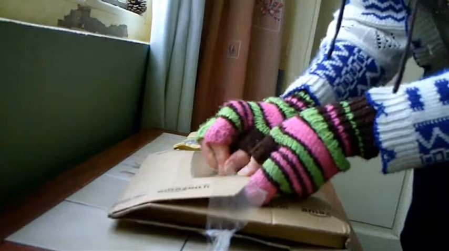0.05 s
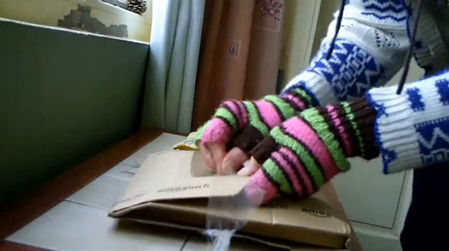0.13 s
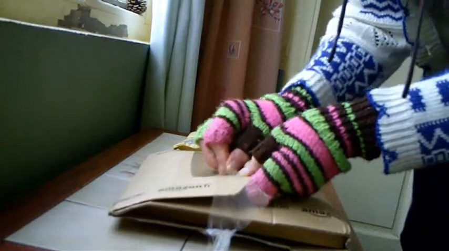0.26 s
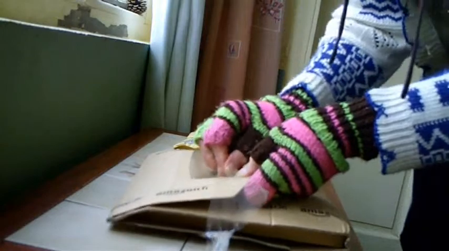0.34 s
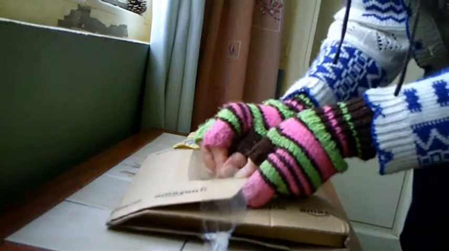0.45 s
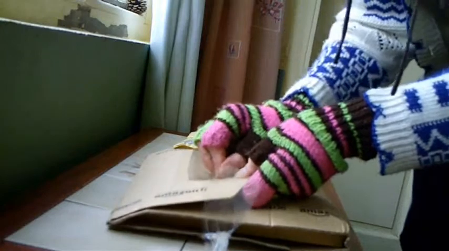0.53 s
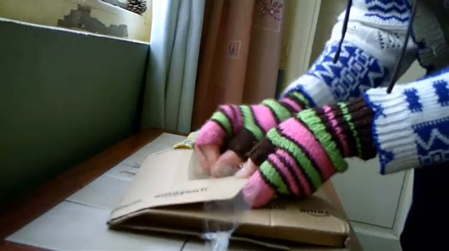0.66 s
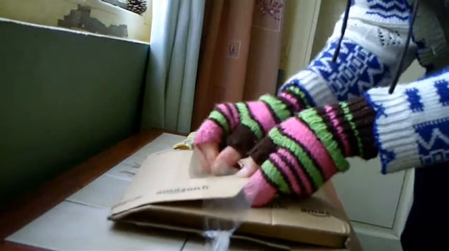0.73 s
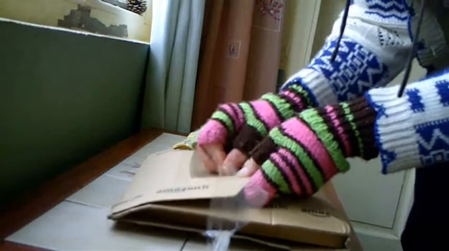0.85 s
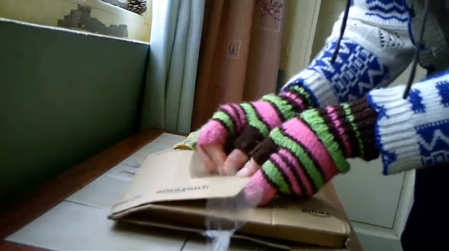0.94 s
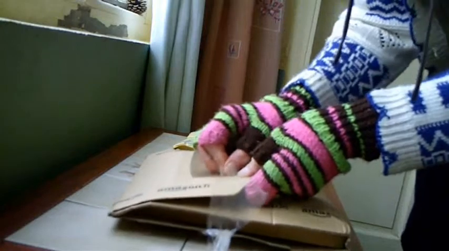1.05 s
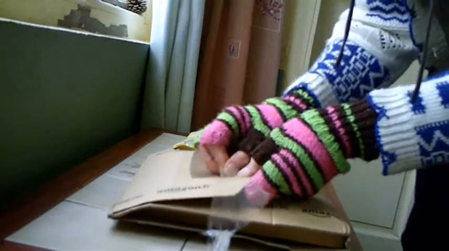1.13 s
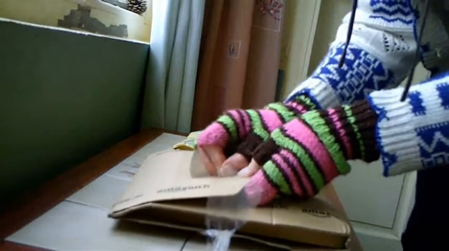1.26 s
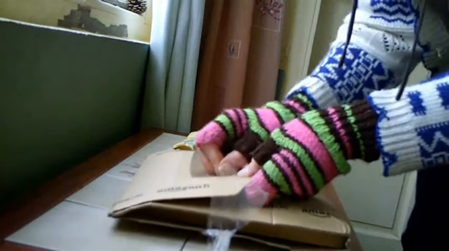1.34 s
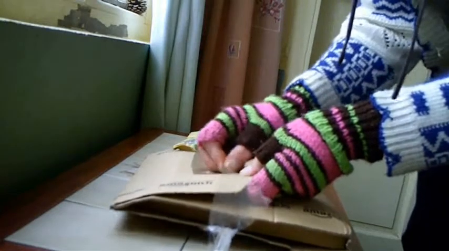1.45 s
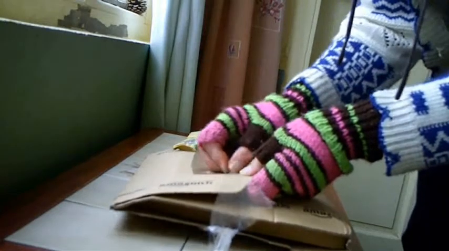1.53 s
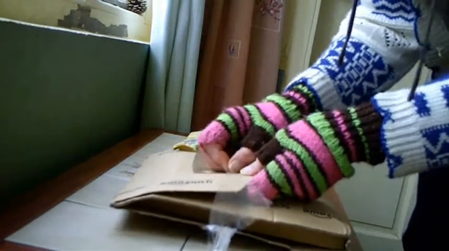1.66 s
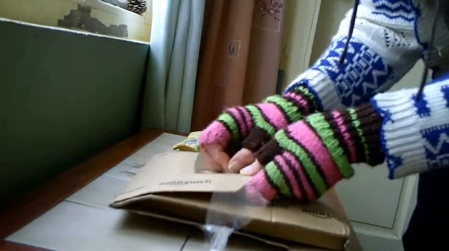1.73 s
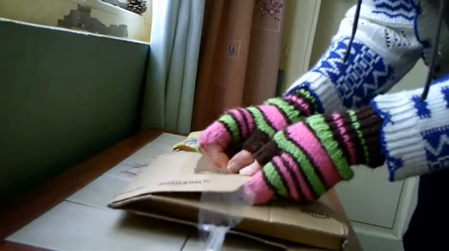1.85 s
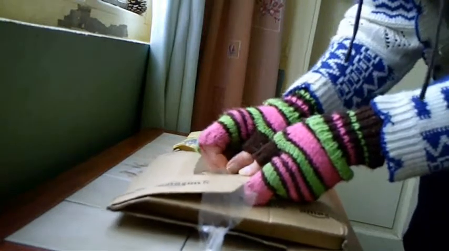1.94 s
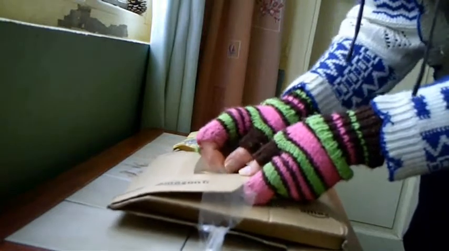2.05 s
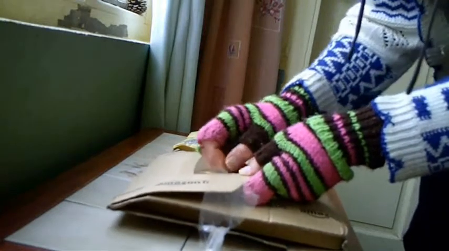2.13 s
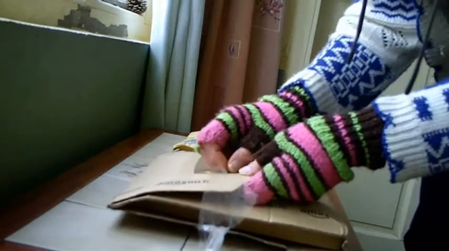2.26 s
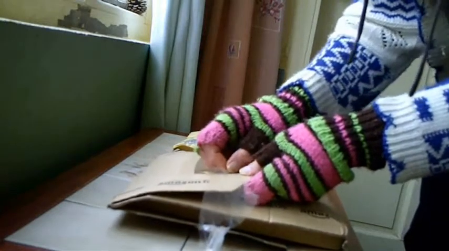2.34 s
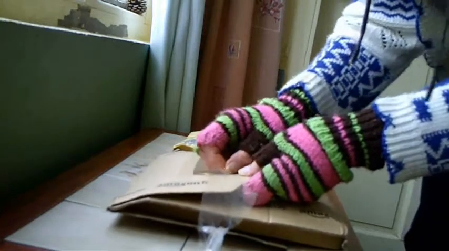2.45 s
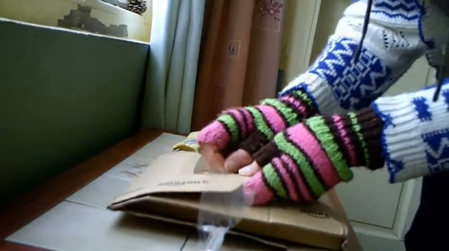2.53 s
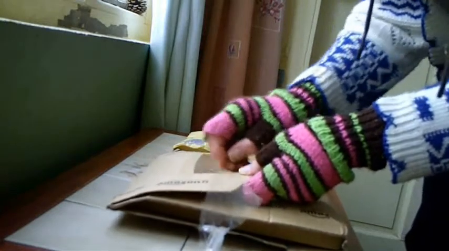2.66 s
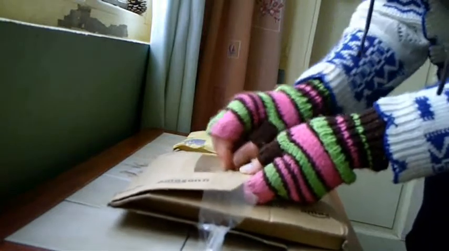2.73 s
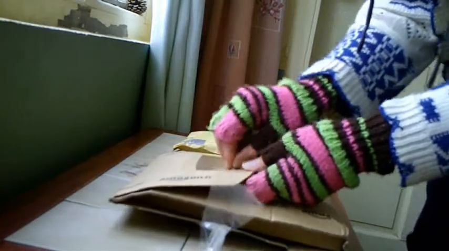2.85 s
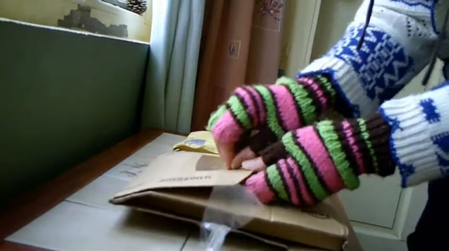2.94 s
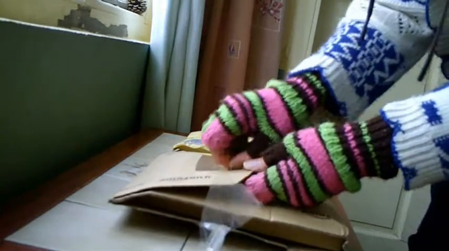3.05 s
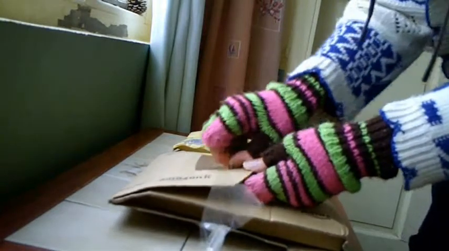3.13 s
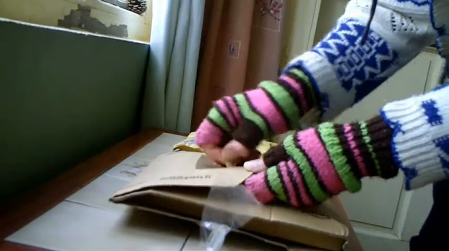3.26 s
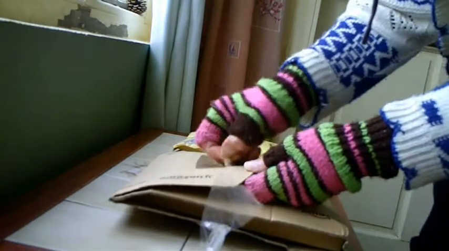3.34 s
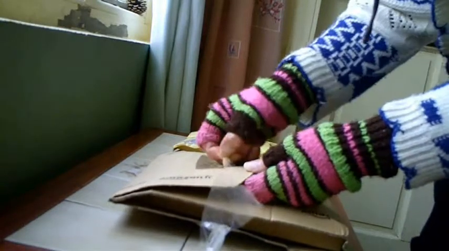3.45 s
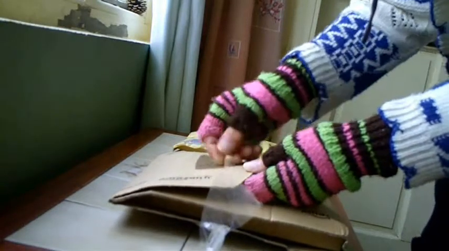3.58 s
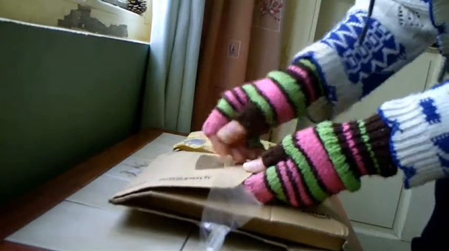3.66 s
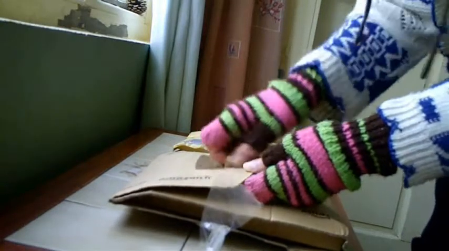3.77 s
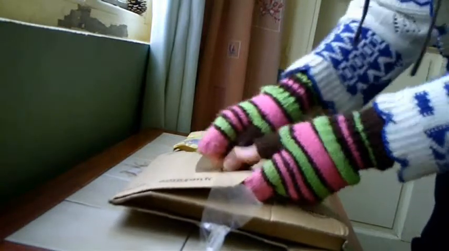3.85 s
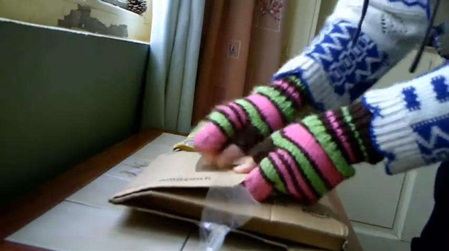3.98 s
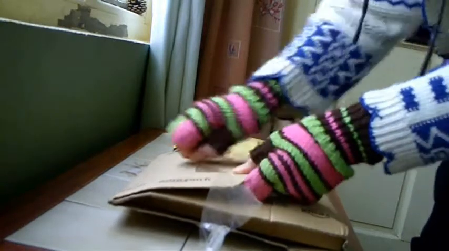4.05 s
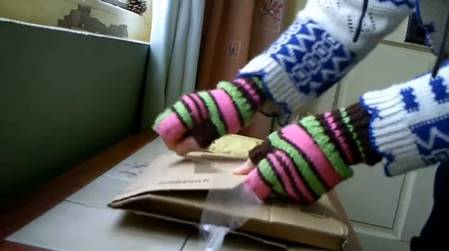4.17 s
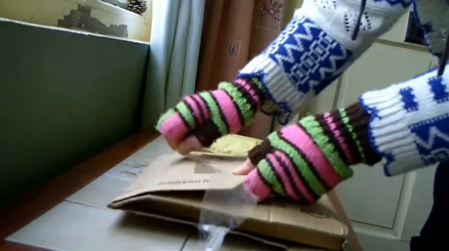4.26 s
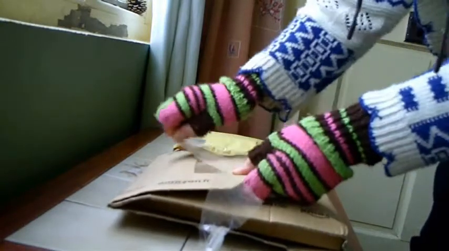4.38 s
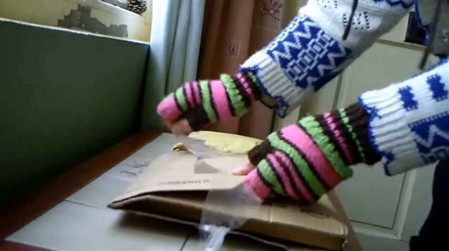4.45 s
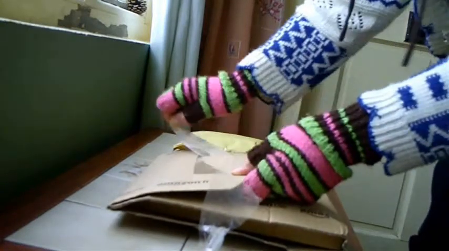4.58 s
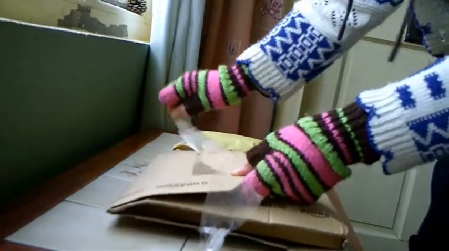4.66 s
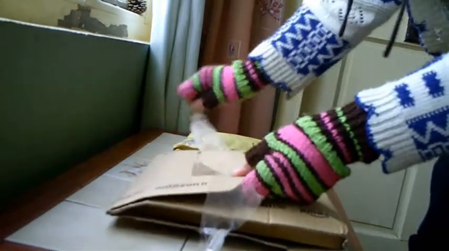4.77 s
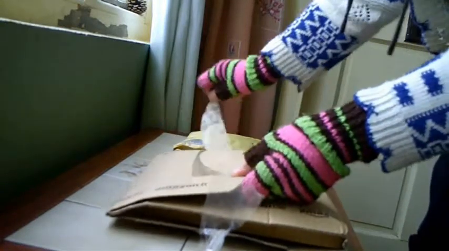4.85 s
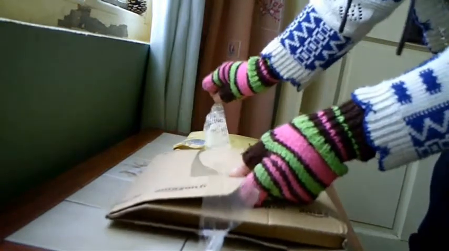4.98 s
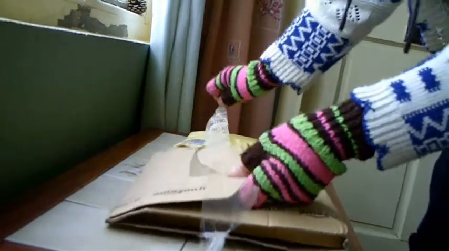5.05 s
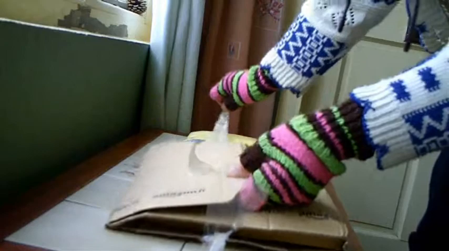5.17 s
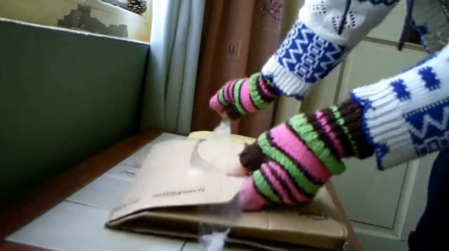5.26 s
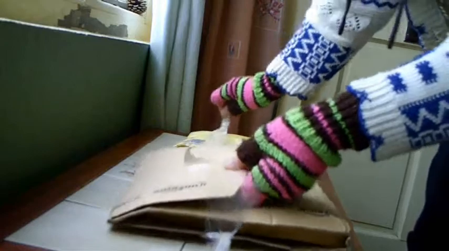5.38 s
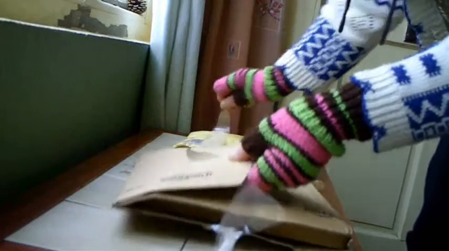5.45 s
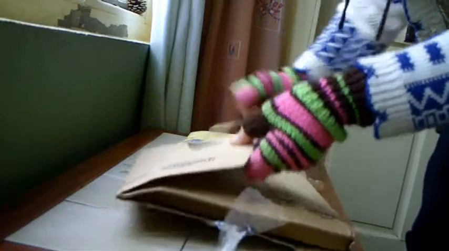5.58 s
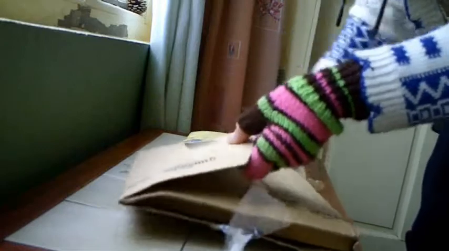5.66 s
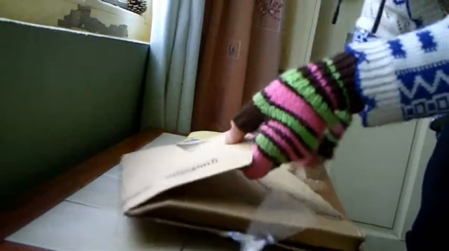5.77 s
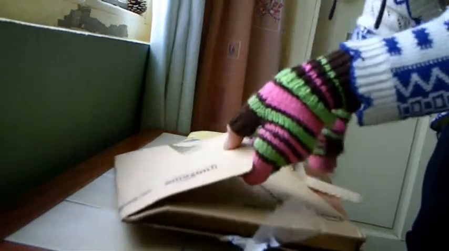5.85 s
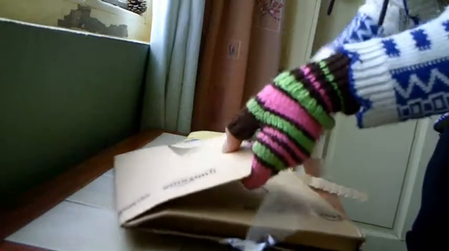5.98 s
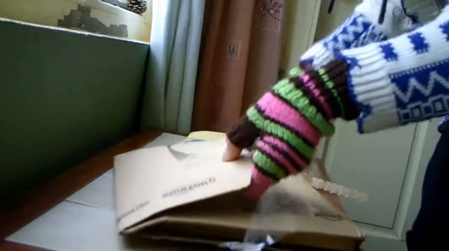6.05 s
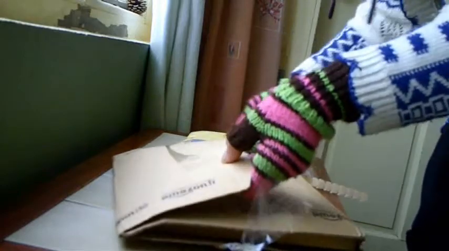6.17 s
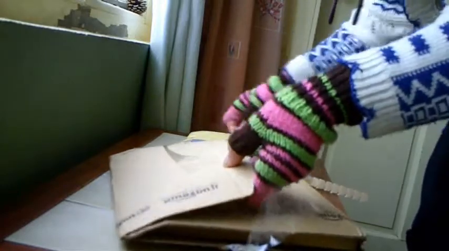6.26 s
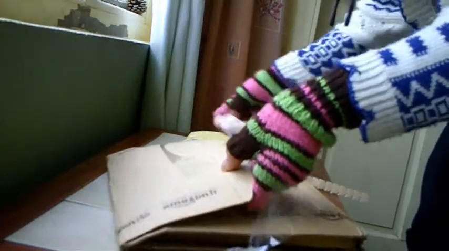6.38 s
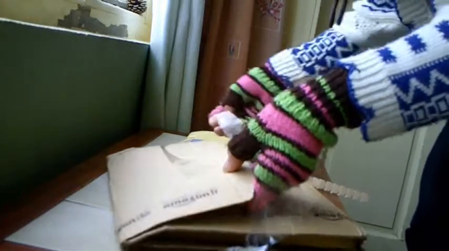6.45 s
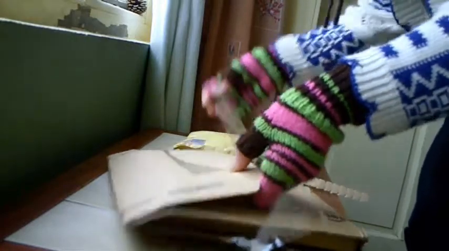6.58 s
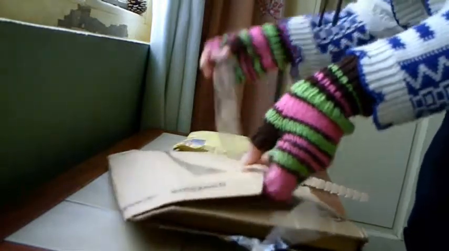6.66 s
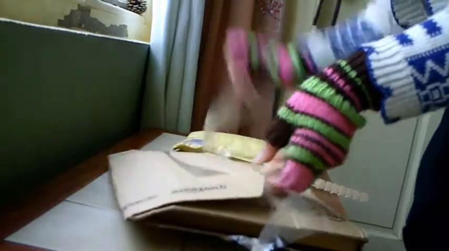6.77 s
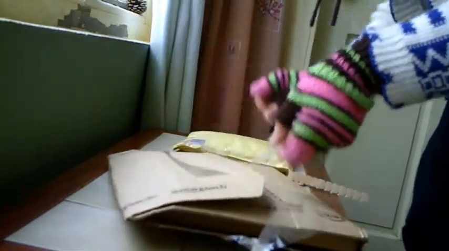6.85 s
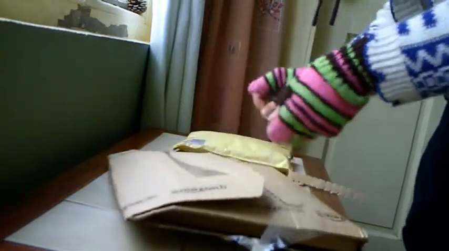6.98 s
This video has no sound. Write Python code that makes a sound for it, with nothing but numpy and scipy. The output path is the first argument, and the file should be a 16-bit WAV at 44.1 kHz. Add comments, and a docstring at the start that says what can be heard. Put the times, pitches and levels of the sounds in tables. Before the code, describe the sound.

Packing tape is picked loose and ripped off a cardboard box, breaking free with a crack, followed by rubbing and crinkling.

```python
"""Packing tape is picked loose and ripped off a flat cardboard box on a table in a small room.
The glue lets go in countless tiny snaps that fizz, drum on the box and ring in the taut strip,
until the tape breaks free with a crack and the lid thumps back. Fingers rub and flick the card
and the loose tape crinkles and squeaks, over a low rumble and the faint hum of a distant motor."""
import sys
import numpy as np
from scipy import signal
from scipy.fft import rfft, irfft, next_fast_len
from scipy.io import wavfile
from scipy.ndimage import uniform_filter1d

SR = 44100
rng = np.random.default_rng(int(sys.argv[2]) if len(sys.argv) > 2 else 0)


def unload_wav(signal):
    """Save mono or channel-first audio to the path in sys.argv[1] as 16-bit WAV at rate SR, clipped to [-1, 1]."""
    wavfile.write(
        sys.argv[1],
        SR,
        np.round(np.clip(np.atleast_2d(signal).T, -1, 1) * 32767).astype(np.int16),
    )


N = 309141
TIME = np.arange(N) / SR
BREAK_S = 5.209   # the tape comes free


def from_db(db):
    """Decibels to gain."""
    return 10 ** (np.asarray(db) / 20)


def unit_rms(x):
    """Scale to an rms of 1."""
    return x / np.sqrt(np.mean(x ** 2) + 1e-20)


def add(out, start, piece):
    """Mix a short sound in at a start time in seconds."""
    at = int(start * SR)
    out[at:at + len(piece)] += piece[:N - at]


def automation(rows):
    """Turn timed breakpoints into one curve per column."""
    times, *columns = np.transpose(rows)
    return [np.interp(TIME, times, column) for column in columns]


def colour(x, spectrum):
    """EQ a steady sound to a spectrum, rolling off steeply past its ends; rms 1."""
    size = next_fast_len(len(x))
    hz, db = np.transpose(spectrum)
    bins_hz = np.maximum(np.arange(size // 2 + 1) * SR / size, 1)
    skirts = np.minimum(bins_hz / hz[0], 1) ** 4 * np.minimum(hz[-1] / bins_hz, 1) ** 4
    eq = from_db(np.interp(np.log(bins_hz), np.log(hz), db))
    return unit_rms(irfft(rfft(x, size) * skirts * eq, size)[:len(x)])


def noise(spectrum, samples=N):
    """Coloured noise, rms 1."""
    return colour(rng.standard_normal(samples), spectrum)


def drift(rate_hz):
    """Smooth random modulation with a spread of 1."""
    step, settle = 40, 2000
    pole = np.exp(-2 * np.pi * rate_hz * step / SR)
    white = rng.standard_normal(N // step + settle + 2)
    slow = signal.lfilter([1], [1, -2 * pole, pole * pole], white)[settle:]
    return np.interp(np.arange(N) / step, np.arange(len(slow)), unit_rms(slow))


def grains(per_s, spread_db, clump_db):
    """Tiny snaps of uneven size that come in clumps; rms 1 at any density."""
    sizes = from_db(spread_db * np.minimum(rng.exponential(1, N), 4))
    signs = rng.choice([-1, 1], N)
    fires = rng.random(N) < per_s / SR
    clumps = from_db(clump_db * drift(100))
    return unit_rms(sizes * signs * fires * clumps / np.sqrt(per_s))


def resonate(x, hz, width_hz):
    """One resonance with unity gain at its peak."""
    radius = np.exp(-np.pi * width_hz / SR)
    feedback = [1, -2 * radius * np.cos(2 * np.pi * hz / SR), radius ** 2]
    return signal.lfilter(np.array([1, 0, -1]) * (1 - radius ** 2) / 2, feedback, x + 1e-18)


def stroke(start, length, attack_s, release_s, db_per_s=0):
    """Envelope of one hand movement: it rises, holds on a slope and dies away."""
    t = TIME - start
    hold = from_db(db_per_s * (np.clip(t, 0, length) - length / 2))
    return np.clip(t / attack_s, 0, 1) * hold * np.exp(-np.maximum(t - length, 0) / release_s)


def strokes(rows, **shape):
    """Two envelopes, hiss and lid rasp, over a run of like movements."""
    return sum(from_db([[hiss_db], [rasp_db]]) * stroke(start, length, **shape)
               for start, length, hiss_db, rasp_db in rows)


def echoes(t60, wet_db, wall_s=0.015):
    """Envelope of the reflections: table and near walls within milliseconds, then a short tail."""
    t = TIME[:SR // 5]
    tail = from_db(-60 * t / t60) * np.clip((t - 0.002) / 0.0026, 0, 1)
    wall = from_db(-12) * np.exp(-((t - wall_s) / 0.00099) ** 2)
    return from_db(wet_db) * (tail + wall) / np.linalg.norm(tail + wall)


def burst(source, db, decay_s, reflections, peak_s=0.00222, window_s=0.0047):
    """A fast-dying hit and its reflections, with the energy of its level held for window_s."""
    t = TIME[:len(source)] - peak_s
    direct = np.exp(2 * np.minimum(t / 0.00053, -t / decay_s))
    scattered = np.abs(signal.fftconvolve(direct, reflections ** 2)[:len(t)])
    hit = source * np.sqrt(direct + scattered)
    return from_db(db) * hit * np.sqrt(window_s * SR / np.sum(hit ** 2))


def room(x):
    """The room scatters the long sounds along paths that change as the hands move."""
    reflections, hop = echoes(t60=0.14, wet_db=-4), SR // 16
    out, fade = x.copy(), np.sin(np.linspace(0, np.pi, 2 * hop))
    for at in range(0, N, hop):
        piece = x[at:at + 2 * hop]
        paths = reflections * rng.standard_normal(len(reflections))
        add(out, at / SR, signal.fftconvolve(piece * fade[:len(piece)], paths))
    return out / np.sqrt(1 + np.sum(reflections ** 2))


# The low end of the room tone. Each row: frequency in Hz, EQ gain in dB.
RUMBLE_EQ = [(15, -9.5), (25, 4.5), (38, 2), (52, 0.5), (80, -2), (92, -9.5), (103, -16), (118, -14),
             (145, -7.5), (185, -29.5), (240, -18), (300, -35)]
# The airy hiss above it. Each row: frequency in Hz, EQ gain in dB.
AIR_EQ = [(120, -21), (200, -2), (293, -10), (327, -9), (378, -12), (471, -12.5), (653, -16), (957, -18),
          (1350, -20), (2060, -22), (5910, -29), (6240, -28), (15500, -33.5)]
# A distant motor. Each row: time in seconds, pitch in Hz, level in dB.
MOTOR_CURVE = [(0, 120.5, -46), (1.4, 120.7, -35.5), (3.0, 123, -50), (4.3, 117.5, -35.5), (5.4, 124, -38),
               (5.85, 130, -34), (6.55, 132, -36), (7.0, 131, -48)]

def room_tone():
    """A bed of low rumble, soft hiss, wavering motor hum and a thin whine."""
    motor_hz, motor_db = automation(MOTOR_CURVE)
    cycles = np.cumsum(motor_hz + 0.6 * drift(5.1)) / SR
    hum = from_db(motor_db + 0.61 * drift(2.6)) * np.sqrt(2) * np.sin(2 * np.pi * cycles)
    whine = from_db(-67) * unit_rms(resonate(rng.standard_normal(N), hz=6379, width_hz=50))
    return from_db(-26) * noise(RUMBLE_EQ) + from_db(-39.3) * noise(AIR_EQ) + hum + whine


# The bright brush of a hand on card. Each row: frequency in Hz, EQ gain in dB.
RUB_EQ = [(590, -31), (1000, -5), (1110, -5.5), (2810, -0.5), (4290, -9), (6120, -3.5), (10100, -6),
          (11100, -7), (14100, -7), (15500, -13)]
# The dull body of cardboard. Each row: frequency in Hz, EQ gain in dB.
CARD_EQ = [(90, -37), (170, -3), (280, 3.5), (400, 0), (520, 3.5), (780, -4.5), (1050, 1), (1400, -7.5),
           (1800, -6), (2500, -14.5), (5000, -21)]
# Hand moves. Each row: start in seconds, length in seconds, hiss in dB, lid rasp in dB.
HAND_SLIDES = [(1.73, 0.18, -38, -44), (2.79, 0.09, -43, -50), (2.95, 0.13, -48, -47),
               (3.23, 0.33, -44, -52), (3.8, 0.19, -44, -44), (5.26, 0.04, -35.5, -42),
               (5.335, 0.11, -35, -40), (5.46, 0.15, -41.5, -44), (5.69, 0.15, -35.5, -44),
               (6.7, 0.085, -40.5, -45)]

def hand_slides():
    """Skin and wool brush over the card with a smooth, swelling hiss."""
    hiss, rasp = strokes(HAND_SLIDES, attack_s=0.03, release_s=0.02, db_per_s=10)
    return hiss * noise(RUB_EQ) + rasp * noise(CARD_EQ)


# The hollow of the box. Each row: mode frequency in Hz, gain in dB.
BOX_MODES = [(165, -0.5), (240, 1.5), (281, 3.5), (337, 3.5), (396, 1.5)]
# Thuds on the box. Each row: start in seconds, relative level in dB.
BOX_BUMPS = [(0.574, -34.5), (0.729, -38.5), (1.07, -44), (1.346, -32), (1.44, -39), (1.921, -35),
             (5.21, -21), (5.43, -30), (5.546, -39), (5.66, -35), (6.393, -39)]

def box_bumps(damping=0.059):
    """The box is knocked and scuffed; its damped modes barely ring."""
    push, reflections = np.zeros(N), echoes(t60=0.23, wet_db=-4.5)
    for start, db in BOX_BUMPS:
        contact = resonate(noise(CARD_EQ, SR // 5), hz=400, width_hz=384)
        add(push, start, burst(contact, db + 13, decay_s=0.014, reflections=reflections))
    hollow = sum((-1) ** k * from_db(db) * resonate(push, hz, damping * hz)
                 for k, (hz, db) in enumerate(BOX_MODES))
    return 0.46 * push + from_db(-1.5) * hollow


# The thin crackle of tape lifting or creasing. Each row: frequency in Hz, EQ gain in dB.
CRACKLE_EQ = [(1000, -11.5), (1500, -15.5), (2200, -5.5), (3000, -6.5), (4400, -9), (6100, -4.5),
              (6800, -5), (7900, -0.5), (9600, -2), (11000, -5), (12300, -2.5), (14100, -5.5), (15400, -11)]
# The ring of loose tape. Each row: mode frequency in Hz, bandwidth in Hz, gain in dB.
FILM_MODES = [(2640, 800, -2), (4485, 400, 0), (5900, 1000, -8), (9350, 570, 5), (12900, 1100, -8)]
# The hand squeezes the tape. Each row: start in seconds, length in seconds, relative level in dB.
TAPE_SQUEEZES = [(6.27, 0.35, -50), (6.3, 0.025, -42), (6.355, 0.025, -41), (6.428, 0.03, -42),
                 (6.505, 0.025, -40), (6.872, 0.02, -45), (6.98, 0.02, -42)]

def tape_crinkle():
    """Creases pop in the loose tape and ring its thin film."""
    envelope = sum(from_db(db) * stroke(start, length, attack_s=0.01, release_s=0.012)
                   for start, length, db in TAPE_SQUEEZES)
    creases = grains(per_s=1000, spread_db=0.5, clump_db=1.5)
    film = sum((-1) ** k * from_db(db) * resonate(creases, hz, width_hz)
               for k, (hz, width_hz, db) in enumerate(FILM_MODES))
    return envelope * (unit_rms(film) + 0.7 * colour(creases, CRACKLE_EQ))


# Loose tape squeaks on the fingers. Each row: start in seconds, pitch in Hz, level in dB.
TAPE_SQUEAKS = [(3.853, 2950, -30), (6.310, 9400, -40), (6.312, 12700, -39), (6.435, 9200, -38),
                (6.742, 4430, -35.5)]

def tape_squeaks(width_hz=450, decay_s=0.006):
    """The film sticks and slips for an instant, ringing in one narrow band."""
    out, reflections = np.zeros(N), echoes(t60=0.12, wet_db=-6)
    for start, hz, db in TAPE_SQUEAKS:
        band = resonate(rng.standard_normal(SR // 5), hz, width_hz)
        add(out, start, burst(resonate(band, hz, width_hz), db, decay_s, reflections))
    return out


# The bright edge of a crack. Each row: frequency in Hz, EQ gain in dB.
EDGE_EQ = [(1500, 0.5), (3000, -13), (4500, -3.5), (6500, 0.5), (8700, 3), (11000, -1.5), (13500, 0),
           (15500, -8)]
# The midrange voice of the taut strip. Each row: frequency in Hz, EQ gain in dB.
STRIP_EQ = [(1100, -7), (1700, -7), (2300, -6), (2850, -2.5), (3200, -6.5), (3800, -11), (6000, -15),
            (12000, -32)]

def crack(edge_db, knock_db, ring_db, ring_hz, decay_s=0.0024):
    """One crack in three layers: a bright edge, a pitched ring of tape and a slower knock of card."""
    bright_tail, dark_tail = echoes(t60=0.12, wet_db=-3), echoes(t60=0.14, wet_db=-2)
    edge, ring, knock = (noise(eq, SR // 5) for eq in (EDGE_EQ, STRIP_EQ, CARD_EQ))
    # Free tape rings; tape on card is damped.
    width_hz = min(2400 * from_db(0.53 * (knock_db - ring_db)), 5000)
    return (burst(edge, edge_db + 1.2, decay_s, bright_tail)
            + burst(resonate(ring, ring_hz, width_hz), ring_db, 0.71 * decay_s, bright_tail)
            + burst(knock, knock_db + 4, 3.1 * decay_s, dark_tail))


def handling_ticks(from_s=1.4, per_s=3, level_db=-44, spread_db=2):
    """The handled tape gives faint cracks at random moments."""
    out, span_s = np.zeros(N), N / SR - from_s
    for when, size in rng.random((int(per_s * span_s), 2)):
        db = level_db + spread_db * (2 * size - 1)
        add(out, from_s + when * span_s, crack(db, knock_db=db - 10, ring_db=db - 4, ring_hz=2500))
    return out


# Picks and flicks. Each row: start in seconds, relative levels of edge, knock and ring in dB,
# ring pitch in Hz.
PICKING_SNAPS = [(0.043, -42, -25.5, -33, 1350), (1.939, -28.5, -38, -27, 2560),
                 (2.118, -21, -25, -25, 1800), (2.606, -11.5, -17.5, -15, 1770),
                 (2.831, -24, -47, -39, 2860), (3.176, -39, -54, -44, 2070), (3.28, -30, -42, -33, 2760),
                 (3.313, -27.5, -39, -42, 2780), (3.56, -35, -52, -39, 2660), (3.66, -35, -37, -36, 2600),
                 (3.771, -37, -35.5, -35, 1600), (3.829, -33, -42, -37, 2850), (3.874, -28, -33, -27, 2370),
                 (3.92, -28, -33, -44, 2590), (3.999, -26, -33, -36, 2750), (4.156, -23, -24, -26, 2760),
                 (5.335, -40, -54, -26.5, 2920), (5.428, -22.5, -19.5, -23, 2080),
                 (5.546, -32, -38, -37, 2690), (5.659, -24, -30, -47, 1600), (5.846, -18, -44, -44, 2350),
                 (6.049, -34, -52, -45, 1840), (6.083, -27, -43, -25.5, 2170),
                 (6.127, -27.5, -47, -22.5, 2790), (6.155, -25, -45, -27, 3030),
                 (6.504, -34.5, -55, -37.5, 2420), (6.682, -30, -25, -25, 1700),
                 (6.733, -35, -36, -36, 1600)]

def picking_snaps():
    """Tape and card crack as they are picked at and bent."""
    out = np.zeros(N)
    for start, *voicing in PICKING_SNAPS:
        add(out, start, crack(*voicing))
    return out


# Short tugs at the tape. Each row: start in seconds, length in seconds, fizz in dB, lid rasp in dB.
TAPE_TUGS = [(1.93, 0.014, -30, -44), (2.822, 0.045, -35, -36), (3.268, 0.09, -30.5, -41),
             (3.37, 0.06, -33, -42), (3.43, 0.07, -30.3, -38.5), (3.84, 0.05, -31, -37),
             (3.91, 0.035, -32, -37), (5.84, 0.042, -14.3, -28)]

def tape_tugs():
    """Short lengths of tape lift with little body: a slow lift crackles, a quick one hisses."""
    fizz, rasp = strokes(TAPE_TUGS, attack_s=0.014, release_s=0.014, db_per_s=-25)
    per_s = np.clip(2500 * (fizz / from_db(-30)) ** 1.5, 1500, 30000)
    threads = grains(per_s, spread_db=3, clump_db=1.6)
    return fizz * colour(threads, CRACKLE_EQ) + rasp * colour(threads, CARD_EQ)


# The lid's thump. Each row: mode frequency in Hz, relative level in dB, seconds to fall by 60 dB.
THUMP_MODES = [(160, -9.5, 0.18), (246, -20, 0.12), (323, -10, .11), (447, -18, 0.16)]

def break_free(swing_s=0.009):
    """The tape breaks free with a longer crack; let go, the lid swings back and thumps."""
    t = np.maximum(TIME - BREAK_S, 0)
    thump = sum(from_db(db - 60 * t / t60) * np.sin(2 * np.pi * hz * t) for hz, db, t60 in THUMP_MODES)
    out = from_db(0.5) * (1 - np.exp(-t / swing_s)) * thump
    add(out, BREAK_S, crack(edge_db=-11.5, knock_db=-14, ring_db=-7, ring_hz=2400, decay_s=0.006))
    return out


def swept_modes(drive, modes, centre_hz, damping, reach_octaves, wander_db=2.5):
    """The peel line travels over the box and drives the modes near a moving centre, at an even level."""
    out = 0
    for hz, db in modes:
        distance = np.log2(hz / centre_hz) / reach_octaves
        weight = from_db(db + wander_db * drift(9.2)) / (1 + distance ** 2)
        out = out + weight * unit_rms(resonate(drive, hz, damping * hz))
    power = np.abs(uniform_filter1d(out ** 2, size=2200))
    return out / np.sqrt(power + 1e-12)


# The rasp of the lid. Each row: mode frequency in Hz, gain in dB.
LID_MODES = [(472, 8.5), (535, 0.5), (638, -9.5), (745, -8), (850, -5), (968, 5), (1116, -21)]
# The peel line's path over the box. Each row: time in seconds, boom send in dB, boom centre in Hz,
# lid rasp send in dB.
PEEL_PATH = [(4.0, -12, 225, -5), (4.11, -3, 255, 5.5), (4.22, -1, 235, -1), (4.32, -5, 240, -8),
             (4.45, 2, 290, -1), (4.63, -2, 280, -3), (4.75, 3, 255, -5), (4.92, -2.5, 295, -2.5),
             (5.19, -7, 175, -4.5)]
# The long pull. Each row: time in seconds, effort as fizz level in dB, tautness as strip send in dB.
PULL_CURVE = [(3.97, -43, -5), (4.006, -29, -7), (4.044, -23, -9), (4.146, -26, -7), (4.17, -21, -8),
              (4.208, -23, -13), (4.266, -37, -10), (4.314, -39, -13), (4.396, -26, -8), (4.488, -23, -3),
              (4.494, -20, -5), (4.566, -23, -8), (4.91, -20, -1), (4.968, -17, 0), (5.046, -26, -5),
              (5.1, -20, -4), (5.152, -19, -7), (5.195, -21, -4)]

def long_rip(usual_effort_db=-22, rasp_growth=0.35):
    """Glue threads snap by the thousand; coarser slips shake box and strip. All follow the effort."""
    effort_db, taut_db = automation(PULL_CURVE)
    boom_db, boom_hz, rasp_db = automation(PEEL_PATH)
    start = PULL_CURVE[0][0]
    fizz = from_db(effort_db) * stroke(start, BREAK_S - start, attack_s=0.01, release_s=0.024)
    ring = fizz * from_db(taut_db + 0.5)
    boom = fizz * from_db(boom_db - 0.5)
    rasp = fizz * from_db(rasp_db - 2.2 + rasp_growth * (effort_db - usual_effort_db))
    rasp_hz = np.interp(TIME, [start, BREAK_S], [690, 520])   # sinks as the tape comes off the lid
    threads = grains(per_s=7300, spread_db=3.5, clump_db=0.3)
    slips = grains(per_s=1100, spread_db=1.5, clump_db=0.6)
    hollow = boom * swept_modes(slips, BOX_MODES, boom_hz, damping=0.055, reach_octaves=0.55)
    lid = rasp * swept_modes(slips, LID_MODES, rasp_hz, damping=0.07, reach_octaves=0.28)
    taut = colour(slips + 0.7 * threads, STRIP_EQ)
    strip = ring * unit_rms(taut + 0.8 * resonate(taut, hz=2850, width_hz=800))
    return fizz * glue_fizz(threads) + hollow + lid + strip


# The sizzle of tearing glue. Each row: frequency in Hz, EQ gain in dB.
GLUE_EQ = [(900, -6), (1400, -16), (2000, -7.5), (3000, -11), (4000, -11), (5000, -6.5), (6200, -1.5),
           (6900, -2.5), (8200, 2), (9700, 2), (11000, -1), (12500, 1), (14200, -2.5), (15400, -7)]

def glue_fizz(threads):
    """The snapping glue threads merge into the bright top of the rip."""
    return colour(threads, GLUE_EQ)


def scene():
    """Tape and cardboard over the room tone, in mono."""
    tape = room(long_rip() + tape_tugs() + tape_crinkle()) + picking_snaps() + tape_squeaks()
    card = hand_slides() + box_bumps() + break_free()
    return (tape + card + room_tone() + handling_ticks())[None]


def record(dry, notch_depth=0.34, cutoff_hz=15600):
    """The microphone port notches the treble, the loudest cracks overload, the top is cut."""
    notched = dry - notch_depth * resonate(dry, hz=11050, width_hz=470)
    clipped = np.clip(notched, -1, 1)
    return signal.sosfilt(signal.ellip(12, 0.1, 80, cutoff_hz, fs=SR, output="sos"), clipped)


dry = scene()
out = record(dry)
unload_wav(out)
```